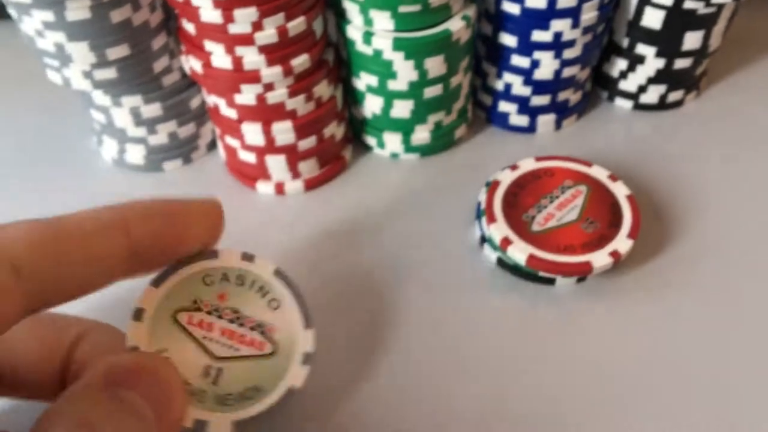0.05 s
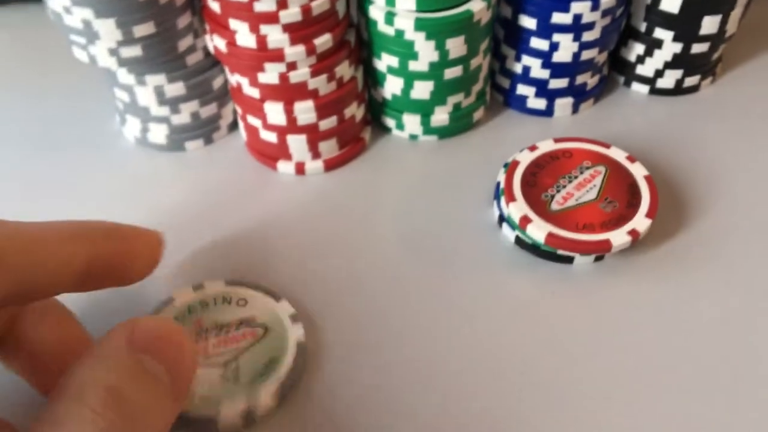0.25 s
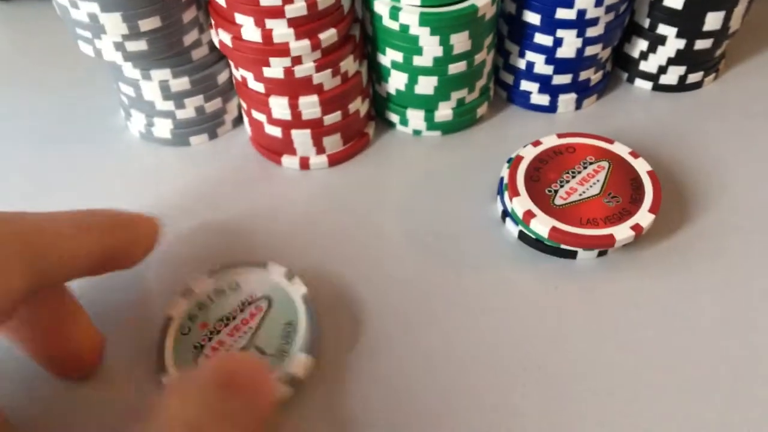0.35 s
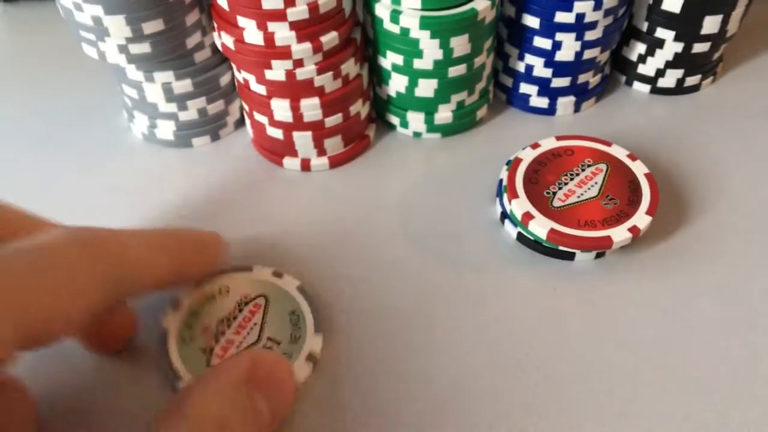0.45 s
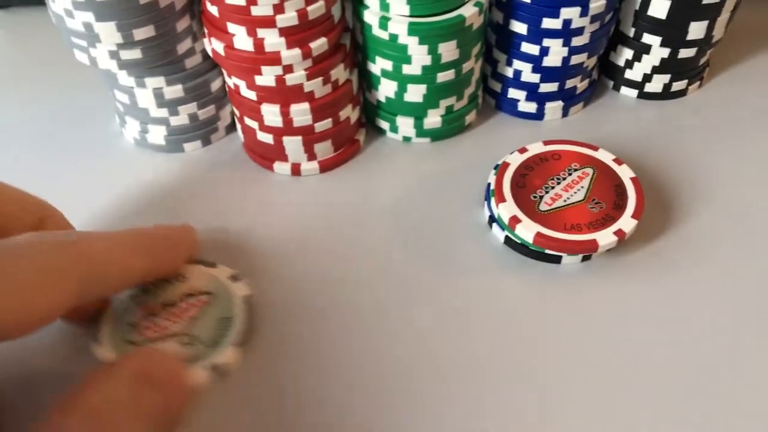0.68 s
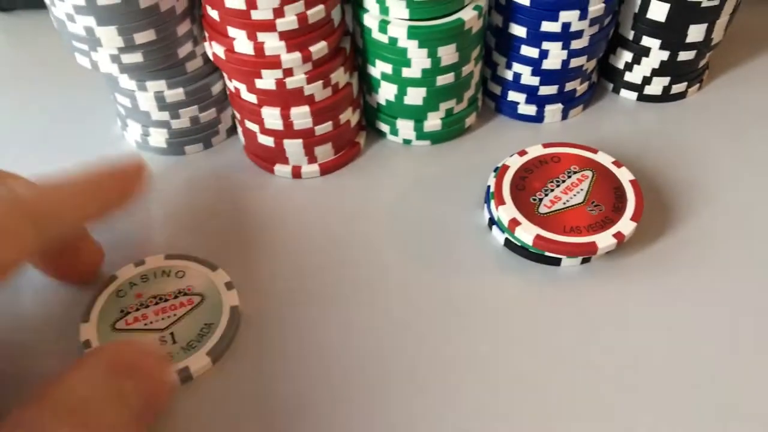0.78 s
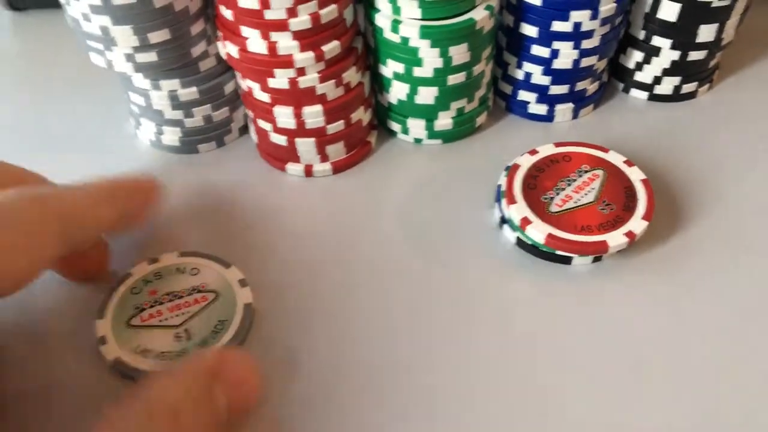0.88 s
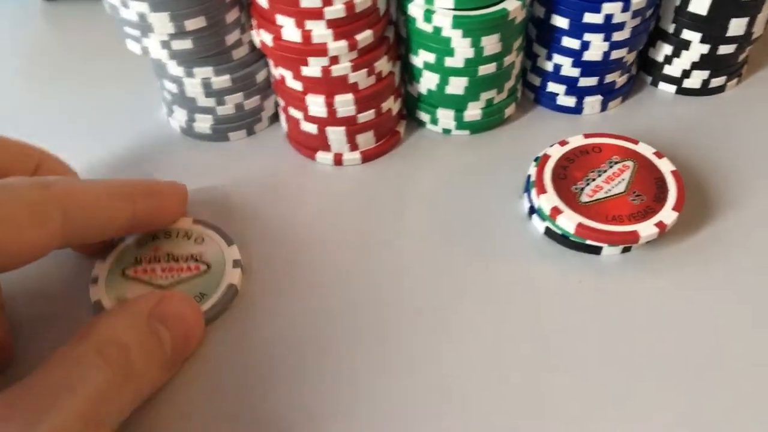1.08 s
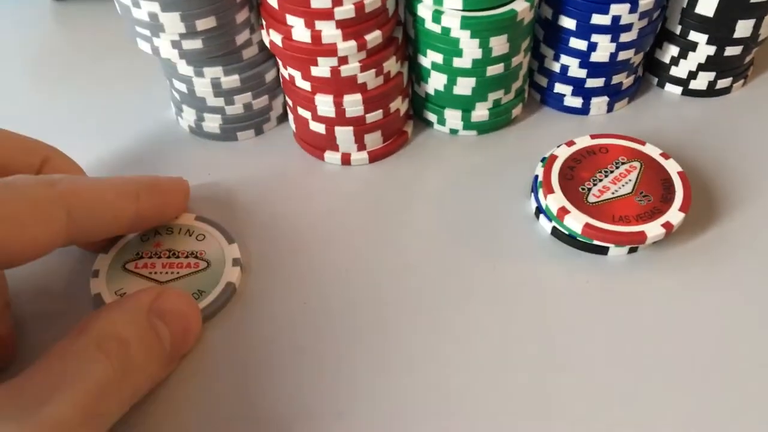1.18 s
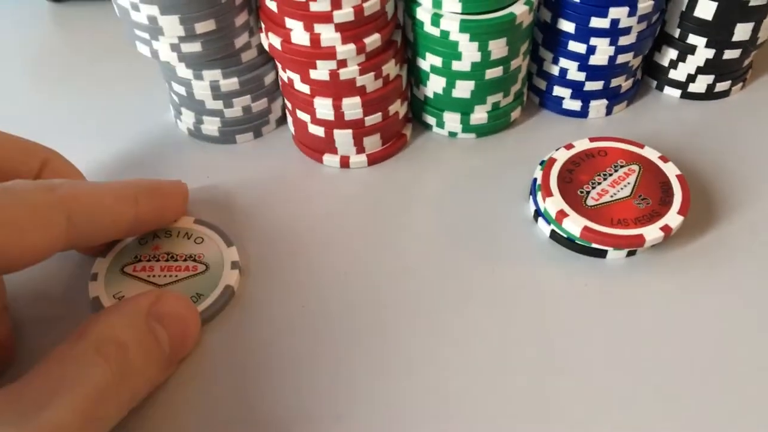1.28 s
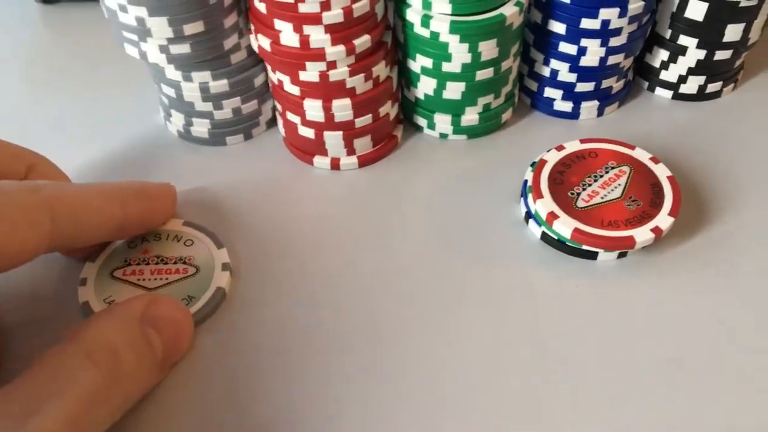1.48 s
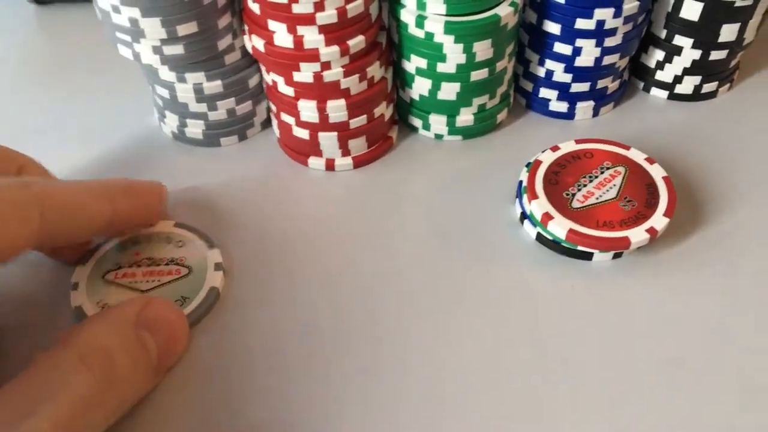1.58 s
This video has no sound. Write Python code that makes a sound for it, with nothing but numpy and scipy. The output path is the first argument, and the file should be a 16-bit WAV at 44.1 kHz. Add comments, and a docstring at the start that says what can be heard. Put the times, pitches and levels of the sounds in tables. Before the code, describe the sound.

Close microphone, small quiet room: a hard chip is laid on another with a woody knock, a gritty scrape and a burst of sharp clicks, then fingers slide them softly before faint low room noise.

```python
"""Poker chips on a table

A hand lays a clay poker chip on another, close by in a small quiet room: it knocks and bounces, its rim
skids and rattles over the lower chip, drags, and snaps flat; then fingers slide the pair over the tabletop.
Impulses and stick-slip trains excite damped modes of chips and table; shaped noise makes the sliding, the
air, and a soft high hiss, faint at first, that swells into a brushing after the chips settle.
A short reverberation joins the chips and table."""
import sys
import numpy as np
from scipy import signal
from scipy.fft import rfft, irfft
from scipy.io import wavfile
from scipy.ndimage import uniform_filter1d

SR = 44100
rng = np.random.default_rng(int(sys.argv[2]) if len(sys.argv) > 2 else 0)


def materialize(psi):
    """Save the field psi as 16-bit PCM at rate SR to the path in sys.argv[1].

    A 1-D psi becomes a single channel; in a 2-D psi each row is a channel.
    """
    bounded = np.clip(np.atleast_2d(psi).T, -1, 1)
    quanta = np.round(bounded * 32767).astype(np.int16)
    wavfile.write(sys.argv[1], SR, quanta)


N = 72765
T = np.arange(N) / SR   # time, s


def from_db(db):
    """Logarithmic level: decibels become an amplitude gain."""
    return 10 ** (np.asarray(db) / 20)


def rms_one(x):
    """Normalization: a signal is scaled to unit rms."""
    return x / np.sqrt(np.mean(x ** 2) + 1e-20)


def level_curve(curve):
    """Amplitude envelope: gain is interpolated in decibels and is zero outside the curve."""
    start_s, level_db = np.transpose(curve)
    inside = (T >= start_s[0]) * (T <= start_s[-1])
    return from_db(np.interp(T, start_s, level_db)) * inside


def impulses(start_s, level_db):
    """Impulsive excitation: each contact is a one-sample force."""
    return np.bincount(np.round(start_s * SR).astype(int), from_db(level_db), N)


def noise(colour):
    """Spectral shaping: white noise takes the given spectrum, falling away below its first point, at unit rms."""
    pitch_hz, density_db = np.transpose(colour)
    f = np.maximum(np.fft.rfftfreq(N, 1 / SR), 1)
    gain = from_db(np.interp(np.log(f), np.log(pitch_hz), density_db))
    gain *= np.minimum(f / pitch_hz[0], 1) ** 2
    return rms_one(irfft(rfft(rng.standard_normal(N)) * gain, N))


def wobble(span_s):
    """Random modulation: averaged noise of unit rms varies over about the given time."""
    return rms_one(uniform_filter1d(rng.standard_normal(N), max(int(span_s * SR), 1)))


def band(x, low_hz, high_hz):
    """Band limitation: a gentle band-pass filter."""
    return signal.sosfilt(signal.butter(2, [low_hz, high_hz], "band", fs=SR, output="sos"), x + 1e-18)


def ring(force, modes):
    """Modal superposition: the force excites dying sines, neighbours in opposite phase."""
    out = np.zeros(N)
    for k, (pitch_hz, level_db, t60_s) in enumerate(modes):
        radius = from_db(-60 / (t60_s * SR))   # decay per sample
        angle = 2 * np.pi * pitch_hz / SR
        poles = [1, -2 * radius * np.cos(angle), radius * radius]
        mode = signal.lfilter([0, np.sin(angle)], poles, force + 1e-18)
        out += (-1) ** k * from_db(level_db) * mode
    return out


def slips(per_s):
    """Stick-slip friction: random impulses of uneven size and either sign, at unit rms."""
    spread_db = 4
    sizes = from_db(spread_db * np.clip(rng.standard_normal(N), -2, 2)) * rng.choice([-1, 1], N)
    return rms_one(sizes * (rng.random(N) < per_s / SR))


# spectrum of the quiet air: pitch_hz [Hz], density_db [dB per Hz, relative]
AIR_COLOUR = [(25, -15), (40, 0.5), (55, -4), (70, -6.5), (110, -9.5), (140, -16), (225, -11.5), (290, -20),
              (400, -22.5), (530, -27.5), (720, -17), (1000, -28), (1300, -27), (1600, -30), (1900, -33.5),
              (3000, -40), (5000, -44.5), (9000, -45.5), (16000, -49)]
# narrow resonances in the steady noise: pitch_hz [Hz], level_db [dB, relative], t60_s [s]
DRONE_MODES = [(250, -1, .15), (305, 0, 0.18), (700.4, 0, .15), (845, -4, 0.15), (1000, -3.5, 0.197),
               (1276, -6, 0.22), (1530, -4.5, .15)]


def room_tone():
    """Steady background: broadband air noise, resonances driven by noise, and a low sinusoidal hum."""
    air_db, drone_db = -59, -70
    hum_hz, hum_db = 48.5, -63.5
    hum = np.sqrt(2) * np.sin(2 * np.pi * (hum_hz * T + rng.random()))
    drone = rms_one(ring(rng.standard_normal(N), DRONE_MODES))
    return from_db(air_db) * noise(AIR_COLOUR) + from_db(drone_db) * drone + from_db(hum_db) * hum


# soft high hiss, faint in the background, then swelling into a brushing: start_s [s], level_db [dB]
HISS_LEVEL = [(0, -76), (.55, -85.5), (.75, -63), (.85, -70.5), (.945, -68.5), (.965, -75.5), (1.17, -78),
              (1.26, -99)]
# spectrum of the hiss: pitch_hz [Hz], density_db [dB per Hz, relative]
HISS_SPECTRUM = [(500, -6), (2500, -4.5), (6500, -1), (7600, -8), (9200, -2.5), (12000, -8), (16000, -12.5)]


def high_hiss():
    """Modulated noise: a faint high hiss swells into a brushing after the chips settle."""
    return level_curve(HISS_LEVEL) * noise(HISS_SPECTRUM)


# chip contacts: start_s [s], ring_db [dB, force on the chip], knock_db [dB, force on the table]
CHIP_CONTACTS = [(.2468, -21.5, -13.5), (.2662, -32, -19), (0.2767, -32.5, -22.5), (0.2863, -35.5, -25.5),
                 (0.2986, -48, -30), (.3172, -45.5, -31.5), (0.3809, -17, -20), (0.394, -15, -20.5),
                 (0.401, -21.5, -16.5), (0.404, -11, -18.5), (0.408, -6, -20), (.4120, -19, -17),
                 (.4166, -12, -22.5), (.4219, -17.5, -32), (.4295, -38, -29.5), (0.4607, -41, -28.5),
                 (0.4744, -25, -30.5), (.4790, -29.5, -26.5), (0.5005, -24.5, -27), (0.512, -19, -26),
                 (0.518, -30, -35.5), (0.5281, -31, -32.5), (0.5367, -32, -32), (.5410, -15, -25.5),
                 (.5453, -12.5, -28.5), (0.5475, -12.5, -30), (.5655, -30, -34), (0.5697, -14.5, -29),
                 (0.574, -23, -23)]
# modes of one chip: pitch_hz [Hz], level_db [dB, relative], t60_s [s]
CHIP_MODES = [(6600, 0, .021), (6920, -14.5, .012), (8800, -27.5, .008), (9870, -17.5, .02),
              (11300, -22.5, 0.0069), (12400, -28.5, 0.0059), (15250, -26, .012)]


def contacts():
    """Impact excitation: sharp touches ring and click the chip, and pass a force to the table."""
    crack_db, crack_low_hz, crack_high_hz = 11, 2690, 5930
    edge_db, edge_low_hz, edge_high_hz = 4, 10500, 14000   # the bright edge of each click
    start_s, ring_db, knock_db = np.transpose(CHIP_CONTACTS)
    force = impulses(start_s, ring_db)
    crack = from_db(crack_db) * band(force, crack_low_hz, crack_high_hz)
    edge = from_db(edge_db) * band(force, edge_low_hz, edge_high_hz)
    return ring(force, CHIP_MODES) + crack + edge, impulses(start_s, knock_db)


# modes of the table: pitch_hz [Hz], level_db [dB, relative], t60_s [s]
TABLE_MODES = [(256, -30, 0.14), (358.4, -29, 0.12), (404, -30, 0.15), (485, -23, 0.074),
               (611.6, -28.5, .08), (746.6, -23, 0.063), (819.6, -18, 0.068), (926, -23, .1),
               (1165.8, -18, .11), (1226.3, -17.5, 0.11), (1272, -25, .08), (1330, -29, 0.055),
               (1455, -25.5, 0.0727), (1568, -23, .12), (1791, -19, .09), (1872, -21, 0.062),
               (2131, -21.5, .06), (2175.5, -22.5, .06), (2424, -21, 0.0625), (3000, -26, 0.039)]
# spectrum of the table's dense, short-lived modes: pitch_hz [Hz], density_db [dB per Hz, relative]
WOOD_COLOUR = [(70, -9.5), (150, -14), (260, -11), (600, -5.5), (1200, 0.5), (2300, -1), (3200, -3.5),
               (4400, -8.5), (6000, -26.5), (16000, -49.5)]


def table(force):
    """Modal radiation: a dull thud with a near echo, separate modes, and a wash of dense modes."""
    thud_db, thud_low_hz, thud_high_hz = 17.5, 950, 2820
    echo_s, echo_db = .003, -3   # the knock returns from a near surface
    mode_spread_db, contact_s = 3.5, 0.011
    wood_db, wood_t60_s = 9, 0.041
    thud = from_db(thud_db) * band(force, thud_low_hz, thud_high_hz)
    echo = from_db(echo_db) * np.interp(T - echo_s, T, thud)
    modes = np.zeros(N)
    for k, mode in enumerate(TABLE_MODES):
        # each touch lands on another spot and favours other modes
        coupling = from_db(mode_spread_db * wobble(contact_s))
        modes += (-1) ** k * ring(force * coupling, [mode])
    keep = from_db(-120 / (wood_t60_s * SR))   # energy kept per sample
    energy = signal.lfilter([1 - keep], [1, -keep], force ** 2 + 1e-18)
    wash = from_db(wood_db) * np.sqrt(energy) * noise(WOOD_COLOUR)
    return thud + echo + modes + wash


# spectrum of the reverberation: pitch_hz [Hz], density_db [dB per Hz, relative]
ROOM_SPECTRUM = [(100, -4), (800, 4.5), (2500, -0.5), (6500, -10.5), (16000, -13.5)]


def room(x):
    """Diffuse reverberation: convolution with a short, dull, exponentially decaying noise."""
    room_db, room_t60_s = -19, .3
    tail = noise(ROOM_SPECTRUM) * from_db(-60 * T / room_t60_s)
    return from_db(room_db) * signal.fftconvolve(x, tail / np.linalg.norm(tail))[:N]


# how hard chip drags on chip: start_s [s], level_db [dB]
DRAG_LEVEL = [(.25, -63), (.325, -56), (.358, -42), (.378, -53), (.42, -33), (.452, -43.5), (.492, -33.5),
              (.508, -33.5), (.525, -45), (.585, -46.5), (.615, -74)]
# modes of two chips pressed together: pitch_hz [Hz], level_db [dB, relative], t60_s [s]
PAIR_MODES = [(4300, -12.5, .006), (5287, -7, .014), (5675, -3, 0.0066), (6020, -4.5, 0.011),
              (6380, -3.5, 0.0057), (6750, -3, 0.0081), (9800, -12.5, 0.0056), (11440, -19.5, 0.0048),
              (12500, -21, 0.0028), (15200, -22, .007)]


def drag():
    """Sliding friction: one face grates over the other, ringing the pair and forcing the table."""
    slips_per_s, knock_db = 1800, -16.5
    grit = slips(slips_per_s)
    effort = level_curve(DRAG_LEVEL)
    return effort * rms_one(ring(grit, PAIR_MODES)), from_db(knock_db) * effort * grit


# the hand's weight bumps the table: start_s [s], level_db [dB, force]
HAND_BUMPS = [(0.251, -43.5), (0.292, -43.5), (0.406, -43.5), (0.939, -51.5)]
# slow modes of the whole table: pitch_hz [Hz], level_db [dB, relative], t60_s [s]
FRAME_MODES = [(44, -2.5, .22), (102, 2, .11)]


def bumps():
    """Low-frequency resonance: soft pushes rock the whole table."""
    start_s, level_db = np.transpose(HAND_BUMPS)
    return ring(impulses(start_s, level_db), FRAME_MODES)


# the ribbed rim skids: peak_s [s], rise_s [s], fall_s [s], chirp_db [dB], knock_db [dB, force on the table]
RIM_SKIDS = [(0.339, .0032, 0.0029, -15, -12.5), (0.5475, 0.0022, 0.0016, -16, -18)]


def skids():
    """Stick-slip burst: a quick run of slips swells and dies, making both chips chirp."""
    slips_per_s = 3700
    sound, knock = np.zeros(N), np.zeros(N)
    for peak_s, rise_s, fall_s, chirp_db, knock_db in RIM_SKIDS:
        swell = np.exp(-np.maximum((peak_s - T) / rise_s, (T - peak_s) / fall_s))
        force = slips(slips_per_s) * swell
        chirp = ring(force, PAIR_MODES)
        # the chirp's energy is scaled to the length of its rise and fall
        sound += from_db(chirp_db) * chirp / np.linalg.norm(chirp) * np.sqrt((rise_s + fall_s) * SR)
        knock += from_db(knock_db) * force / np.linalg.norm(force)
    return sound, knock


# chips sliding on the tabletop: start_s [s], level_db [dB, before the rub's own gain]
SLIDE_LEVEL = [(.58, -46.5), (.66, -62), (.73, -52.5), (.80, -53), (.86, -67.5), (1.01, -78),
               (1.028, -48.5), (1.045, -52), (1.075, -61.5), (1.11, -57.5), (1.14, -65.5), (1.175, -58),
               (1.25, -79), (1.4, -87)]
# spectrum of the sliding: pitch_hz [Hz], density_db [dB per Hz, relative]
SLIDE_SPECTRUM = [(100, -8.5), (200, -6.5), (380, -5.5), (520, -21), (900, -5), (1300, -5.5), (1600, 1),
                  (1950, -7), (2400, -2), (3200, -12.5), (5000, -20.5), (8000, -24), (16000, -28)]


def slide():
    """Friction-driven resonance: grainy sliding noise with a faint ringing of the table."""
    ring_db = -6   # table ringing relative to the rubbing noise
    grain_db, grain_s = 1.7, 0.0034
    table_ring = rms_one(ring(rng.standard_normal(N), TABLE_MODES))
    rub = noise(SLIDE_SPECTRUM) + from_db(ring_db) * table_ring
    return level_curve(SLIDE_LEVEL) * rub * from_db(grain_db * wobble(grain_s))


def scene():
    """Superposition: chips and table with their reverberation, then bumps, sliding, hiss and background."""
    chips, force = np.sum([contacts(), drag(), skids()], axis=0)
    # the chips radiate poorly around this frequency
    dip_hz, dip_q = 7740, 5
    dip = signal.lfilter(*signal.iirpeak(dip_hz, dip_q, fs=SR), chips)
    near = chips - dip + table(force)
    return (near + room(near) + bumps() + slide() + high_hiss() + room_tone())[None]


def record(dry):
    """Low-pass filtering: the treble is cut steeply."""
    cutoff_hz = 16000
    return signal.sosfilt(signal.ellip(10, .2, 70, cutoff_hz, fs=SR, output="sos"), dry)


dry = scene()
out = record(dry)
materialize(out)
```